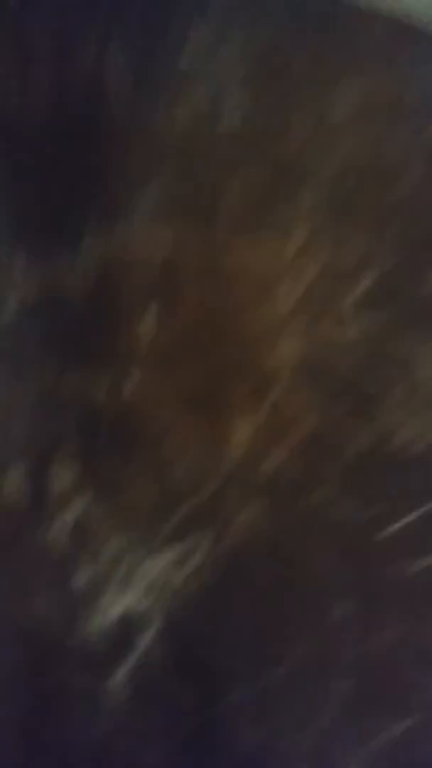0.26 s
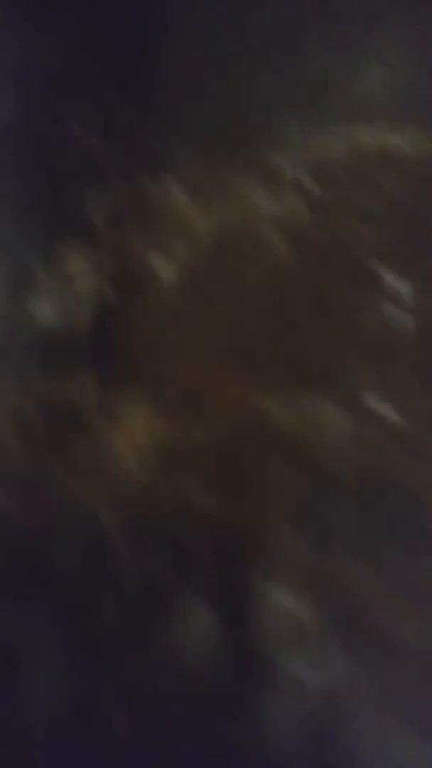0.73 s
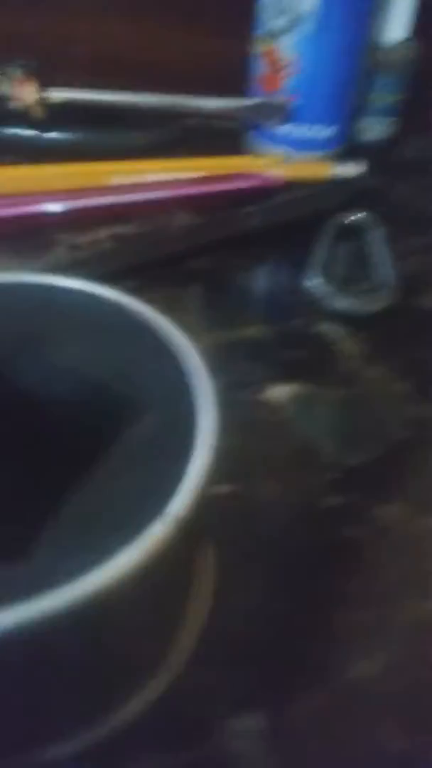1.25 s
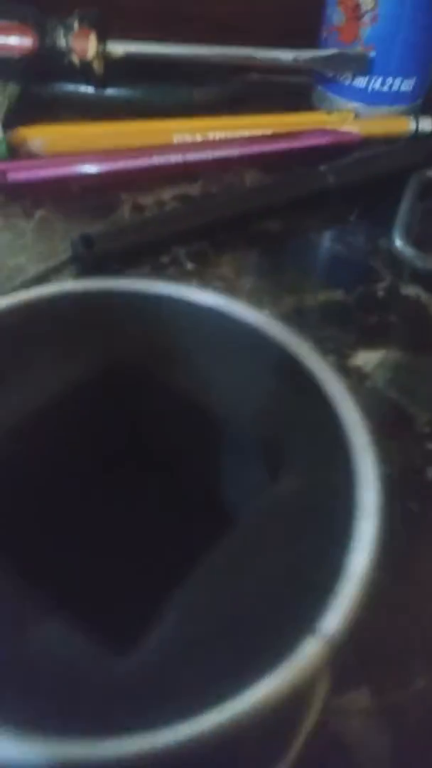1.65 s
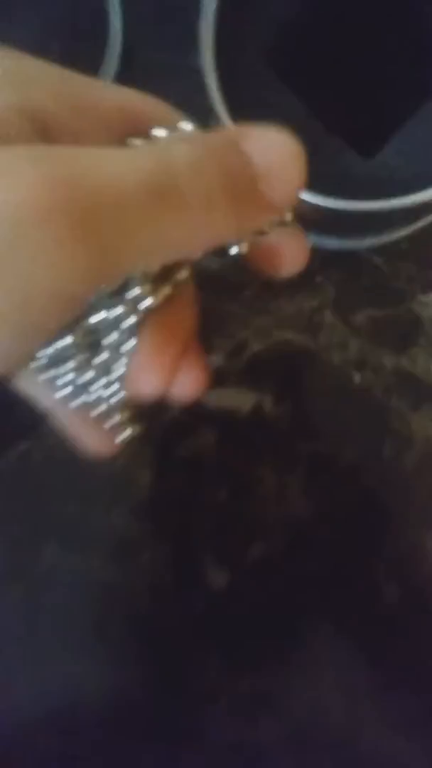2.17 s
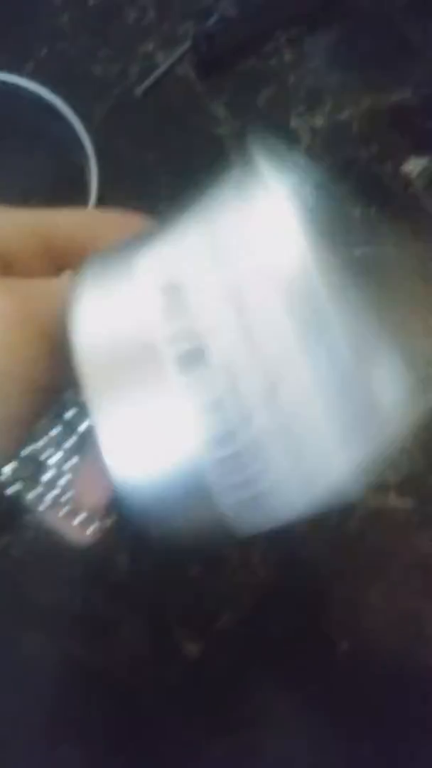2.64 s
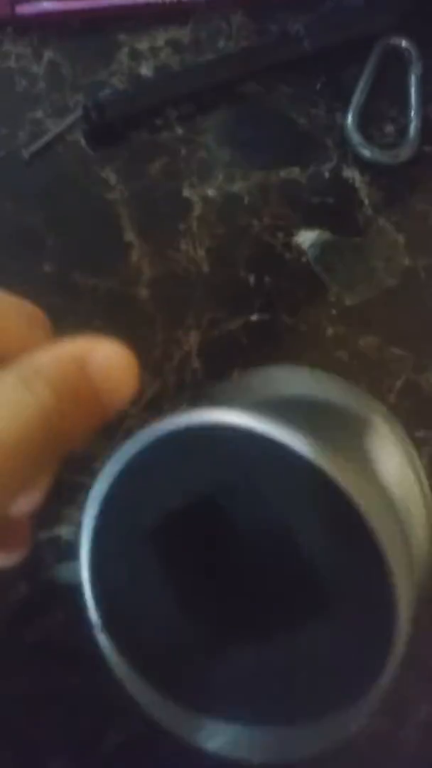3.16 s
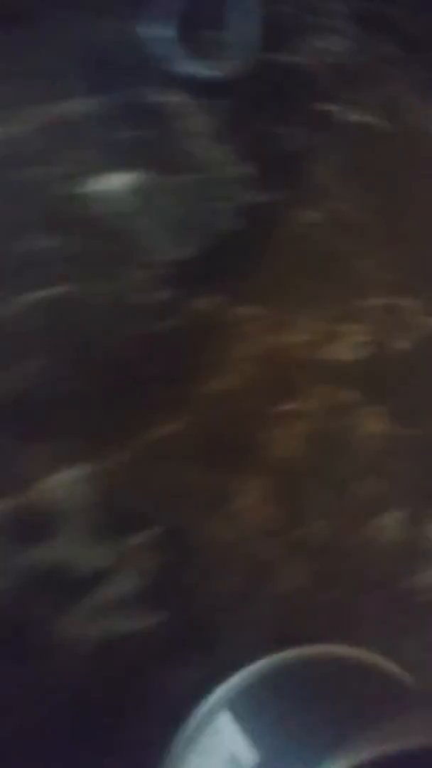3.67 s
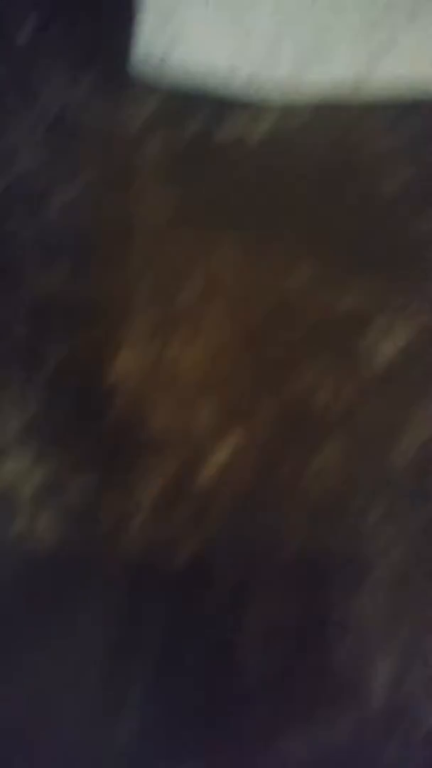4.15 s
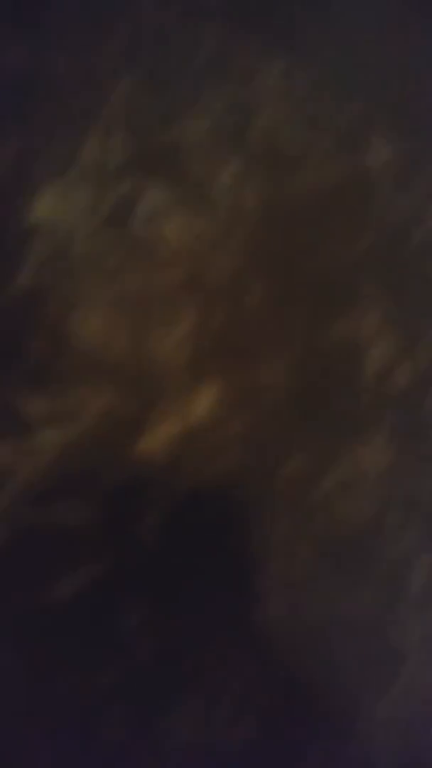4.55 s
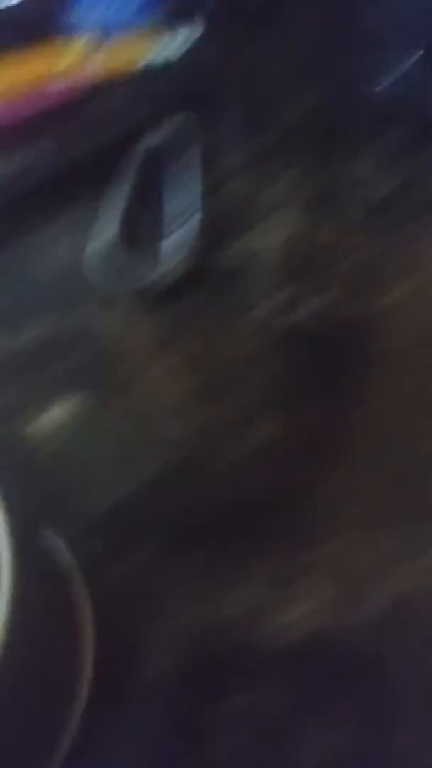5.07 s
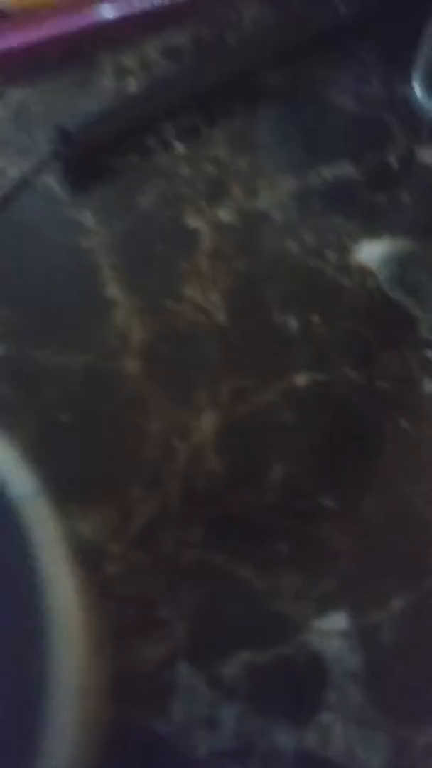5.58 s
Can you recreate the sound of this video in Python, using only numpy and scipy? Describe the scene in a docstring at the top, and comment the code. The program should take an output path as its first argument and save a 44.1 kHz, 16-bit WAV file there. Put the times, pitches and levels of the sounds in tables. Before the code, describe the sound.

Small metal balls snap together in bright quick clicks while a metal tin knocks, scrapes and rocks to rest on a stone countertop.

```python
"""On a stone countertop in a small hard room, a hand with a mesh of small ball magnets knocks, slides and rocks a metal tin.
Knocks and clicks are struck modes plus a dense noisy crash; the balls snap together in quick bright clicks.
Random slips drive the hum and scrape of the sliding tin, two rubs close to the microphone and faint rustling.
Decaying noise tails answer the blows, over a quiet floor and a thin whine; the hardest blows overload the microphone."""
import sys
import numpy as np
from scipy import signal
from scipy.fft import rfft, irfft, next_fast_len
from scipy.io import wavfile

SR = 44100
rng = np.random.default_rng(int(sys.argv[2]) if len(sys.argv) > 2 else 0)


def unload_audio(sound):
    """Save the sound as a 16-bit wav file, at the path given as the first command line argument."""
    columns = np.transpose(np.atleast_2d(sound))
    # keep every value between -1 and 1, then stretch to whole-number steps
    steps = np.round(np.clip(columns, -1, 1) * 32767)
    wavfile.write(sys.argv[1], SR, steps.astype(np.int16))


N = 256612

# Background noise spectrum, relative: (frequency [Hz], level [dB])
FLOOR_COLOUR = [(24, -46.5), (60, -19), (150, -10.5), (345, -8), (520, -9), (950, -13.5), (1700, -16.5),
                (2350, -14), (2800, -17.5), (4400, -19), (6000, -17), (7200, -16.5), (9000, -30),
                (15500, -24)]
FLOOR_DB = -54
# Thin electrical whine; its level is the rms before the mains-rate dips
WHINE_HZ, WHINE_WIDTH_HZ, WHINE_DB = 6553, 77, -54.5
MAINS_HZ = 60

# Decay of the room: (frequency [Hz], t60 [s])
ROOM_T60 = [(100, 0.0073), (400, 0.3421), (1000, 0.2975), (2200, 0.3372), (4000, 0.3016), (6400, 0.2582),
            (9000, 0.4622), (15000, 0.2029)]
# Spectrum of the room as its decay begins: (frequency [Hz], level [dB])
ROOM_COLOUR = [(100, -11), (400, 12), (900, -0.5), (2200, -5), (2700, -3.5), (4500, -5.5), (6400, -2.5),
               (8500, -10.5), (15000, -8.5)]
# Share of room, lower as the microphone comes near, before ROOM_TRIM_DB: (time [s], level [dB])
WETNESS = [(.1,-1.5), (1.2,-5.5), (1.55,-11.5), (1.85,-17), (2.3,-6.5), (2.87,-11), (3,-0.5), (3.77,-1.5),
           (3.88,-8.5), (4.45,-21), (4.7,-16), (5.35,-13), (5.7,-1.5)]
ROOM_TRIM_DB = -7.5

# Dull handling noise: (time [s], level [dB])
HANDLING = [(0,-38), (.6,-66), (1.1,-51), (1.85,-42.5), (2.05,-51), (2.21,-52.5), (2.45,-61.5), (4.1,-57),
            (5.4,-52.5), (5.8,-64.5)]
# Mesh rustling in the hand: (start [s], length [s], first level [dB], last level [dB])
RUSTLES = [(1.86,0.2,-36.5,-59.5), (2.528,0.295,-37,-53.5), (2.871,.1,-30,-52), (5.428,0.19,-44,-61)]
RUSTLE_ATTACK_S, RUSTLE_RELEASE_S = 0.0242, 0.1487
# Rubbing close to the microphone: (start [s], length [s], first level [dB], last level [dB])
RUBS = [(1.709,0.1486,-26.5,-13), (5.359,0.0398,-22,-27.5)]
# Spectrum of the rubbing, relative: (frequency [Hz], level [dB])
RUB_COLOUR = [(35, -43), (60, -18), (160, -8.5), (256, -3), (308, -3.5), (346, -4), (492, -9), (579, -15),
              (1060, -9.5), (1550, -9.5), (3500, -12), (6430, -6), (13000, -22.5), (16000, -27)]
RUB_ATTACK_S, RUB_RELEASE_S = 0.0068, 0.0417

# Tin sliding over stone, one table a stroke: (time [s], hum of the tin [dB], scrape of the rim [dB])
SLIDES = [
    [(.87,-49,-34), (.95,-35.5,-40), (1.0,-28.5,-44), (1.07,-28.5,-35.5), (1.11,-37,-27), (1.15,-53.5,-50)],
    [(1.15,-59.5,-28), (1.18,-22.5,-31), (1.29,-46.5,-29), (1.35,-68,-42.5), (1.41,-54,-39), (1.46,-67,-44),
     (1.55,-35,-24), (1.66,-44,-38), (1.71,-35,-32.5)],
    [(4.56,-39,-66), (4.61,-33,-57.5), (4.64,-34,-31.5), (4.69,-30,-29), (4.84,-36.5,-29), (4.98,-35,-42),
     (5.08,-33.5,-42), (5.19,-23,-42), (5.33,-36,-37), (5.46,-44,-53.5)],
]
# Resonances the stroke sets humming: (multiple of the hum pitch [ratio], width [Hz], level [dB])
HUM_RESONANCES = [(.46, 158.1, -13), (.7, 198.8, -2), (1.001, 200.2, 5), (1.35, 417, -4.5), (1.95, 520, -6),
                  (2.62, 334.8, -8)]
HUM_START_HZ, HUM_RISE_HZ_PER_S = 729.6, 151  # the hum climbs through a stroke
# Spectrum of the rim scrape, relative: (frequency [Hz], level [dB])
SCRAPE_COLOUR = [(60, -19.5), (150, 0), (400, -4), (800, -4.5), (1400, 2), (2200, -9.5), (2600, -7.5),
                 (3500, -9), (4600, -11.5), (6400, -11.5), (8500, -25.5), (15500, -31.5)]
# Spectrum of the contact squeal, relative: (frequency [Hz], level [dB])
SQUEAL_COLOUR = [(3000, -33.5), (4800, -22), (5400, -12.5), (5800, -16), (6250, -0.5), (6600, 0),
                 (7100, -13.5), (8000, -26), (10000, -35), (11800, -23.5), (15500, -29.5)]
# Squeal above the scrape as each stroke begins, one entry a stroke: (level [dB])
SQUEAL_START_DB = [-21.5, -8, 4]
SQUEAL_FADE_DB_PER_S = 13

# Dense short modes set off by every contact, relative: (frequency [Hz], level [dB])
CRASH_COLOUR = [(100, 2.5), (400, -4.5), (1200, 2), (2200, -2.5), (2800, 0.5), (4500, 1), (6400, 2.5),
                (7600, -2.5), (9000, -7.5), (11500, -3.5), (15500, -7.5)]
# Balls snapping together: (time [s], level [dB], brightness [dB], favoured mode [Hz])
CLICKS = [(.004,-19,-8,6485), (.0228,-21.5,-6,6556), (.0867,-9,-4.5,5670), (.1156,-20,-1.5,5200),
          (.1272,-17,3,6100), (.1433,-9.5,1,6076), (.1522,-17.5,-1.5,6070), (.2025,-22.5,5,6385),
          (.2049,-12.5,5.5,6260), (.2143,-13.5,5,6100), (.2258,-15.5,-4,6340), (.4759,-42.5,-2,5700),
          (1.0922,-15,-17,3300), (1.3141,-19.5,-15.5,3225), (1.333,-27,-6.5,6450), (1.5401,-19,-13.5,3380),
          (1.5605,-11,-8,6640), (1.5771,-15.5,-5.5,6640), (1.6198,-22.5,-17,6750), (1.6286,-11,1,6420),
          (1.824,-17,6.5,6320), (1.852,-19.5,-13,6070), (1.9515,-22,-4,6190), (1.9847,-43,10.5,6205),
          (2.002,-46,7.5,6105), (2.1711,-48,1.5,6790), (2.2432,-44,8,6600), (2.2759,-44.5,2,6490),
          (2.3115,-28.5,-4,6850), (2.3165,-25.5,8,6490), (2.5225,-35,0.5,6320), (2.5569,-29,0.5,6650),
          (2.5787,-18.5,-5.5,6590), (2.6147,-32,-3,6850), (2.6415,-28.5,-4.5,6500), (2.646,-18,-1.5,7050),
          (2.7093,-28.5,-4,5650), (2.7335,-44,-8.5,6090), (2.8452,-27,-1,5200), (2.8555,-31,2.5,5750),
          (2.8608,-26,0.5,6700), (2.8652,-16,-2,4060), (2.8723,-17,-1.5,6110), (2.9057,-31.5,7,6320),
          (2.917,-17,5,6290), (3.0535,-24,-3,6640), (3.2008,-34,-19,7560), (3.226,-24,9,6500),
          (3.437,-44,0,7500), (4.5687,-9.5,-9.5,3270), (4.615,-13,-9,3250), (4.6888,-10,-1,6383),
          (4.826,-13.5,0,6270), (4.8415,-12.5,-2.5,6280), (5.4724,-37,6,7300), (5.5347,-35,4,8300),
          (5.5659,-35.5,8.5,7400), (5.6202,-32,-0.5,7070), (5.6422,-27.5,5.5,5800), (5.65,-30.5,9,7510),
          (5.7645,-26,12.5,7340), (5.7712,-26.5,17,6760)]
# Modes of the magnet cluster: (frequency [Hz], level [dB], factor on the ring t60 [ratio])
CLUSTER_MODES = [(770, -4.5, 0.46), (1600, -3.5, 0.54), (2232, -8.5, 1.7), (3402.5, -2.5, 1.2),
                 (4110, -2.5, .7), (5250, -5, 2.9), (5706, -5.5, 0.42), (6063, -0.5, 0.69),
                 (6486, -4.5, 1.1), (7314, 1.5, 0.412), (8150, -30, .7), (11090, -0.5, 0.39),
                 (14092, -1.5, 0.48)]
# Bounds of body, ring and top of a click: (frequency [Hz])
CLICK_EDGES_HZ = [300, 2500, 8000, 16000]
# Body and top against the ring, before brightness tips one against the other
CLICK_BODY_DB, CLICK_TOP_DB, CLICK_T60_S = -15, -6.5, 0.0193

# Sharp blows on tin and counter: (time [s], level [dB], thud above the level [dB],
# hard edge above the level [dB], favoured mode [Hz], ring t60 [s])
KNOCKS = [(0.0256,-4.5,-23,-13.5,1706,0.1), (.029,-8,-14,2.5,2380,0.057), (.045,-24,6,8,354.8,0.115),
          (.062,-20.5,-2,2.5,825,0.0674), (.121,-26,-13,-6.5,1630,0.062), (.266,-12.5,-6,-0.5,1250,0.0357),
          (0.2737,-21.5,4,-4,354.1,0.0488), (0.8489,-13,-26,-18,1325,0.0217), (0.8511,-13,-6,-17,782,0.022),
          (1.1929,-18.5,-9.5,-31.5,1780,0.0093), (1.5171,-17.5,-11,-2,2460,0.0303),
          (1.7048,-29.5,-9,-5.5,702,0.0324), (1.85,-34,12,-9.5,207,0.0286), (2.194,-47,2.5,-17,713,0.0307),
          (2.7925,-38,-16.5,1.5,1248,0.048), (2.9993,-8,-18,-5.5,2257,0.0204),
          (4.388,-18.5,-1.5,3.5,1260,0.0188), (4.4175,-18.5,-9.5,-20.5,872.4,0.0407),
          (4.4696,-35.5,8,-2.5,706,0.0396), (4.5869,-25.5,7,5.5,140.6,0.0355),
          (4.682,-27,-4,-4.5,698,0.028), (5.2068,-21,-27,5.5,1073,0.027), (5.2868,-21.5,-1.5,-6,870,0.0216),
          (5.2978,-28.5,3.5,4,276.4,0.0122), (5.3617,-25.5,-1,-3,508,0.013),
          (5.6789,-7,-18,-4.5,1404,0.0316), (5.7763,-18.5,-10.5,-13,830,0.041)]
# Rim rolling down onto the counter as the tin rocks: (time [s], level [dB],
# hard edge above the level [dB], favoured mode [Hz], rise [s])
ROCKS = [(1.2032,-16.5,-4.5,1531,0.00289), (3.0098,-12,-1,2198,0.00268), (3.22,-12.5,-3.5,1914,0.00705),
         (3.3665,-15.5,-2.5,1932,0.00763), (3.4991,-13.5,-1.5,1747,0.00465), (3.6098,-13,3.5,1748,0.00164),
         (3.69,-18.5,-2,1845,0.00672), (3.7662,-17.5,1.5,1853,0.00265), (3.8262,-16.5,1.5,1812,0.00076),
         (3.8583,-21.5,0.5,1274,0.00158), (3.8785,-22.5,-20.5,874,0.00544), (5.737,-18,-6.5,2180,0.00697),
         (5.786,-21,-10.5,2098,0.0061)]
# Modes of the tin on the counter: (frequency [Hz], level [dB], factor on the ring t60 [ratio])
TIN_MODES = [(134.7, -4.5, 1.2), (208.66, -6.5, 0.29), (272, -7.5, 1), (364.24, -5.5, 1.8),
             (532, -10.5, 2.1), (568.3, -4, 1.7), (682.4, 8.5, 0.6), (823, 12, 1.346), (913.4, 1.5, 1.2),
             (1325.3, -6, 1.2), (1514.8, -2, 1.1), (1627.7, 4.5, 0.99), (1878.6, 0.5, 0.66),
             (2014, -1, 0.64), (2185.5, 4.5, 0.63), (2319, -6.5, 1.7), (3233.7, -4.5, 1.3), (5102, 2, 0.45),
             (6173, 9, 0.45), (6681, 5.5, 0.83), (9530, -15.5, .7), (11758, -16, 0.8)]
# Bounds of thud, hollow body, clank, hard edge and top of a blow: (frequency [Hz])
KNOCK_EDGES_HZ = [100, 520, 1150, 2600, 7500, 16000]
KNOCK_RISE_S = 0.00086
ROCK_THUD_DB, ROCK_T60_S = -15, 0.0283
# A high contact point trades hollow body for clank
LEAN_PIVOT_HZ, LEAN_DB_PER_OCTAVE, LEAN_MAX_DB = 1180, 7.5, 5
# The top lies under the hard edge, the more so the slower the contact
TOP_DB, TOP_DULLING_DB_PER_S = -13, 2204
# Past this ring time, the crash of a blow lengthens only as ring time to the power CRASH_STRETCH
CRASH_KNEE_S, CRASH_STRETCH = .03, 0.32

CUTOFF_HZ = 15850


def amp(db):
    """Turns decibels into gain."""
    return 10 ** (np.asarray(db) / 20)


def unit(x):
    """Scales a sound to rms 1."""
    return x / np.sqrt(np.mean(x ** 2) + 1e-20)


def decay(t60s):
    """Free decay: gain after a time counted in t60s, 60 dB down at 1."""
    return np.exp(-np.log(1000) * t60s)


def read(points, hz):
    """Reads a spectrum on a log-frequency axis."""
    f, value = np.transpose(points)
    return np.interp(np.log(hz + 1), np.log(f), value)


def level(rows, column=1):
    """Gain over time from one dB column of a curve; -120 dB outside it."""
    rows = np.array(rows)
    return amp(np.interp(np.arange(N) / SR, rows[:, 0], rows[:, column], left=-120, right=-120))


def add(mix, s, sound):
    """Mixes a sound in at time s."""
    part = mix[max(round(s * SR), 0):][:len(sound)]
    part += sound[:len(part)]


def coloured(x, points):
    """Gives a sound a spectrum, at rms 1."""
    size = next_fast_len(len(x))
    gain = amp(read(points, np.fft.rfftfreq(size, 1 / SR)))
    return unit(irfft(rfft(x, size) * gain, size)[:len(x)])


def grains(per_s, spread_db):
    """Friction as tiny random slips of uneven size, at rms 1."""
    size = amp(spread_db * np.minimum(rng.exponential(1, N), 4))
    happens = rng.random(N) < per_s / SR
    return unit(rng.standard_normal(N) * size * happens)


def background():
    """Quiet room noise, and an electrical whine that dips and ticks faintly once every mains cycle."""
    floor = coloured(rng.standard_normal(N), FLOOR_COLOUR)
    hz = np.fft.rfftfreq(N, 1 / SR)
    peak = 1 + ((hz - WHINE_HZ) / WHINE_WIDTH_HZ) ** 2
    whine = unit(irfft(rfft(rng.standard_normal(N)) / peak, N))
    cycle = np.arange(N) * MAINS_HZ / SR % 1
    whine = whine * (1 - .75 * np.exp(-((cycle - .5) / .12) ** 2))
    impulses = np.diff((cycle > .5) * 1., prepend=0).clip(0)  # one each mid-cycle
    ticks = coloured(impulses, [(3000, -40), (6000, -12), (7000, 0), (9000, -3), (12000, -8), (16000, -20)])
    return amp(FLOOR_DB) * floor + amp(WHINE_DB) * whine + amp(-67.5) * ticks


def room_tails(count):
    """Responses of the room for different spots, each of energy 1, bands dying at their own speed."""
    hz, t, z = signal.stft(rng.standard_normal((count, SR // 2)), SR, nperseg=256)
    fall_db = 60 * t / read(ROOM_T60, hz)[:, None]
    z = z * amp(read(ROOM_COLOUR, hz)[:, None] - fall_db)
    tails = signal.istft(z, SR, nperseg=256)[1]
    seconds = np.arange(tails.shape[1]) / SR
    tails = tails * (1 - np.exp(-seconds / 0.0032))  # the walls answer after a few ms
    return tails / np.linalg.norm(tails, axis=1, keepdims=True)


def room_gain(s):
    """Gain of the room for a sound made at time s."""
    return amp(np.interp(s, *np.transpose(WETNESS)) + ROOM_TRIM_DB)


def flutter(depth_db):
    """Gain of a contact whose pressure wavers quickly."""
    waver = coloured(rng.standard_normal(N), [(5, -4.0), (30, 0.5), (80, -10.5), (200, -37), (400, -100)])
    return amp(depth_db * waver)


def gesture(start, length, first_db, last_db, attack, release):
    """Gain of one move of the hand: it sets in, grows or fades evenly in dB, and lets go."""
    t = np.arange(N) / SR - start
    held_db = first_db + (last_db - first_db) * np.clip(t / length, 0, 1)
    return np.clip(t / attack, 0, 1) * amp(held_db) * decay(np.maximum(t - length, 0) / release)


def handling():
    """Sparse slips, kept mostly low, make the dull rumble of handling."""
    fumbles = grains(per_s=2000, spread_db=2)
    colour = [(30, -22), (100, -4.5), (250, -5.5), (800, -10.5), (2000, -21), (6000, -45.5)]
    return coloured(fumbles, colour) * level(HANDLING)


def mesh_rustle():
    """Balls shifting in the mesh give faint ticks that fade within each move."""
    colour = [(300, -14.0), (900, 0.0), (2000, -1.5), (4000, 1.0), (6400, 9.0), (9000, -6), (15000, -11)]
    ticks = coloured(grains(per_s=1900, spread_db=3), colour)
    return ticks * sum(gesture(*row, RUSTLE_ATTACK_S, RUSTLE_RELEASE_S) for row in RUSTLES)


def close_rubs():
    """Dense slips under wavering pressure rub close to the microphone."""
    rub = coloured(grains(per_s=12000, spread_db=2), RUB_COLOUR) * flutter(depth_db=0.48)
    return rub * sum(gesture(*row, RUB_ATTACK_S, RUB_RELEASE_S) for row in RUBS)


def resonate(x, hz, width):
    """A steep resonance that follows the curve hz, at rms 1."""
    turn = np.exp(2j * np.pi * np.cumsum(hz) / SR)
    r = np.exp(-np.pi * width / SR)
    # shift the pitch down to zero, low-pass there, and shift back
    return unit((turn * signal.lfilter([1], [1, -2 * r, r * r], x / turn)).real)


def sliding():
    """Slips of the rim on stone make the tin hum and scrape; steady noise makes the contact squeal."""
    slips = grains(per_s=2500, spread_db=-0.5)
    t = np.arange(N) / SR
    elapsed = np.zeros(N)  # time since the current stroke began
    for stroke in SLIDES:
        start, end = stroke[0][0], stroke[-1][0]
        elapsed += (t - start) * (t >= start) * (t < end)

    pitch = HUM_START_HZ + HUM_RISE_HZ_PER_S * elapsed
    hum = unit(sum(amp(db) * resonate(slips, pitch * multiple, width)
                   for multiple, width, db in HUM_RESONANCES))
    hum_gain = sum(level(stroke, column=1) for stroke in SLIDES)

    scrape = coloured(slips, SCRAPE_COLOUR)
    scrape_gain = sum(level(stroke, column=2) for stroke in SLIDES)

    squeal = coloured(rng.standard_normal(N), SQUEAL_COLOUR)
    squeal_gain = sum(amp(db) * level(stroke, column=2) for stroke, db in zip(SLIDES, SQUEAL_START_DB))
    squeal_gain = squeal_gain * amp(-SQUEAL_FADE_DB_PER_S * elapsed)
    return hum * hum_gain + scrape * scrape_gain + squeal * squeal_gain


def strike(modes, favoured_hz, t60, rise, favour_db, crash_db, crash_share):
    """One blow: modes, lifted near the one the contact point favours, and a crash of dense short ones."""
    t = np.arange(SR // 5) / SR
    hz, db, life = np.transpose(modes)[:, :, None]
    phase, detune, chance = rng.standard_normal((3, len(hz), 1))
    nearness = np.exp(-(np.log(hz / favoured_hz) / .06) ** 2)
    db = db + 2 * chance + favour_db * nearness
    # the sound swells while the contact bites in, and dies once it is free
    swell = amp(-8 * (1 - np.minimum(t / max(rise, 1e-4), 1)))
    age = np.maximum(t - rise, 0) / max(t60, .004)  # in ring t60s
    tones = np.sin(2 * np.pi * (hz * (1 + 0.0041 * detune) * t + phase))
    ring = (amp(db) * decay(age / life) * tones).sum(0)
    # the dense modes, too, crowd around the favoured pitch
    grid = np.geomspace(60, SR / 2, num=200)
    crowding = np.exp(-(np.log(grid / favoured_hz) / 0.33) ** 2)
    colour = read(CRASH_COLOUR, grid) + 0.747 * favour_db * crowding
    noise = coloured(rng.standard_normal(len(t)), np.c_[grid, colour])
    crash = amp(crash_db) * decay(age / crash_share) * noise
    return swell * (ring + crash)


def band_filters(edges):
    """Band-passes between neighbouring edges."""
    return [signal.butter(3, pair, "band", fs=SR, output="sos") for pair in zip(edges, edges[1:])]


def weigh(x, filters, levels_db, size):
    """Sets the rms level of each band over the first samples of a blow."""
    bands = [signal.sosfilt(sos, x + 1e-15) for sos in filters]
    return sum(amp(db) * b / np.sqrt(np.mean(b[:size] ** 2)) for b, db in zip(bands, levels_db))


def magnet_clicks(tails):
    """Each ball that snaps home rings the cluster for a few milliseconds."""
    out, filters = np.zeros(N), band_filters(CLICK_EDGES_HZ)
    for k, (s, db, bright_db, hz) in enumerate(CLICKS):
        snap = strike(CLUSTER_MODES, hz, CLICK_T60_S, rise=0.00055, favour_db=17.5, crash_db=13, crash_share=1.0)
        levels_db = db + np.array([CLICK_BODY_DB - bright_db, 0, CLICK_TOP_DB + bright_db])
        snap = weigh(snap, filters, levels_db, size=SR // 125)
        echo = signal.fftconvolve(snap, tails[k % len(tails)])
        add(out, s, snap)
        add(out, s + 0.0017, room_gain(s) * echo)
    return out


def tin_knocks(tails):
    """The tin strikes the counter, ringing its modes, and rocks on its rim with softer contacts."""
    out, filters = np.zeros(N), band_filters(KNOCK_EDGES_HZ)
    blows = [(*row, KNOCK_RISE_S) for row in KNOCKS]
    blows += [(s, db, ROCK_THUD_DB, edge_db, hz, ROCK_T60_S, rise) for s, db, edge_db, hz, rise in ROCKS]
    for k, (s, db, thud_db, edge_db, hz, t60, rise) in enumerate(blows):
        lean_db = LEAN_DB_PER_OCTAVE * np.log2(hz / LEAN_PIVOT_HZ)
        lean_db = np.clip(lean_db, -LEAN_MAX_DB, LEAN_MAX_DB)
        top_db = edge_db + TOP_DB - TOP_DULLING_DB_PER_S * rise
        levels_db = db + np.array([thud_db, -lean_db, lean_db, edge_db, top_db])
        share = (CRASH_KNEE_S / t60) ** (1 - CRASH_STRETCH) if t60 > CRASH_KNEE_S else 1
        near = strike(TIN_MODES, hz, t60, rise, favour_db=12.5, crash_db=12, crash_share=0.83 * share)
        # the walls catch what every side of the tin sends out: a denser mixture
        far = strike(TIN_MODES, hz, t60, rise, favour_db=8.5, crash_db=16.5, crash_share=0.84 * share)
        near, far = (weigh(blow, filters, levels_db, size=SR // 50) for blow in (near, far))
        echo = signal.fftconvolve(far, tails[k % len(tails)])
        add(out, s, near)
        add(out, s + .002, room_gain(s) * echo)
    return out


def scene():
    """Everything on the counter, heard from one point."""
    tails = room_tails(count=12)
    hand = handling() + mesh_rustle() + close_rubs()
    mix = background() + hand + sliding() + magnet_clicks(tails) + tin_knocks(tails)
    return mix[None]


def record(dry):
    """The microphone overloads with a firm knee; then the band limit."""
    ceiling = .86  # of full scale
    clipped = dry / (1 + (dry / ceiling) ** 8) ** (1 / 8)
    lowpass = signal.firwin(255, CUTOFF_HZ, window=("kaiser", 9), fs=SR)
    return signal.oaconvolve(clipped, lowpass[None], "same")


dry = scene()
out = record(dry)
unload_audio(out)
```